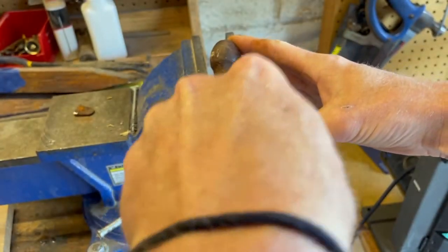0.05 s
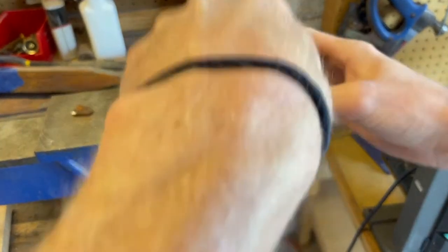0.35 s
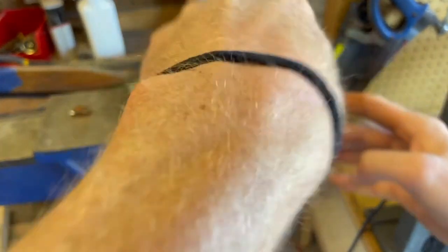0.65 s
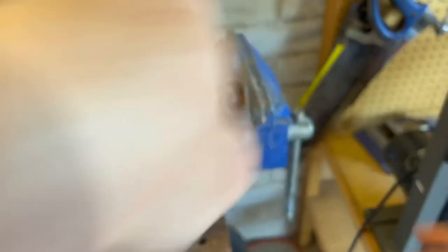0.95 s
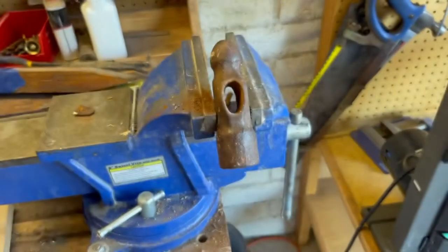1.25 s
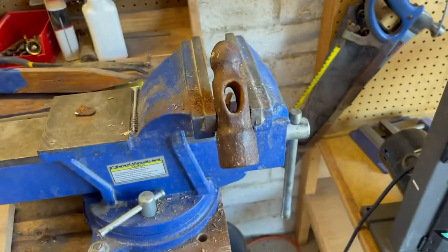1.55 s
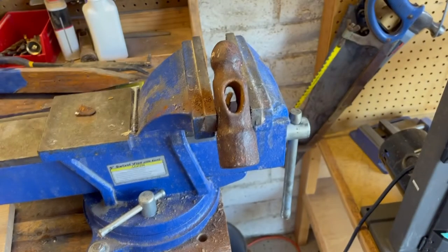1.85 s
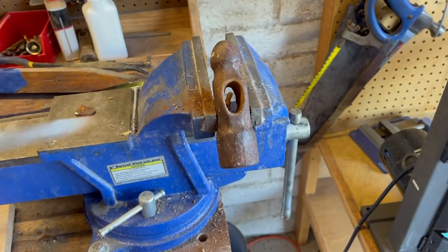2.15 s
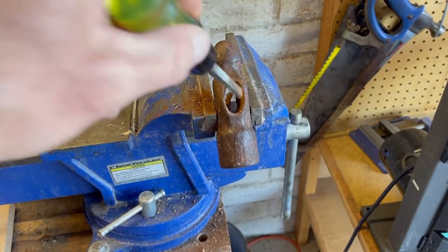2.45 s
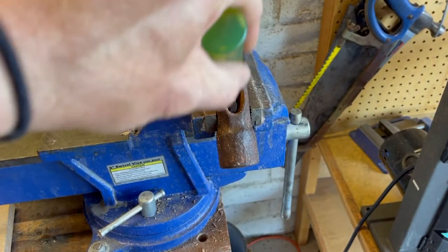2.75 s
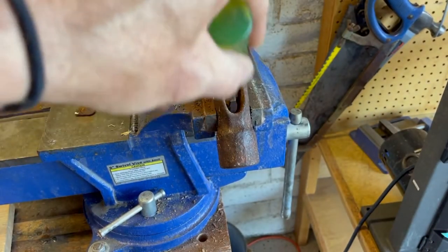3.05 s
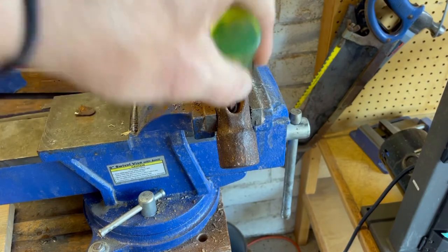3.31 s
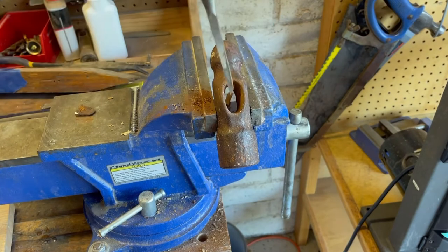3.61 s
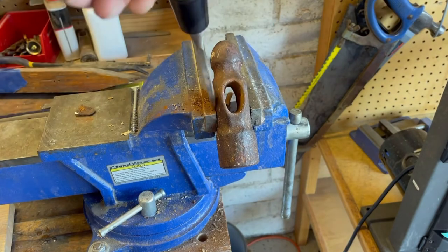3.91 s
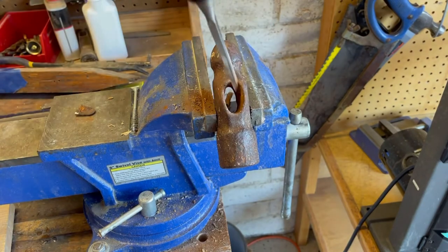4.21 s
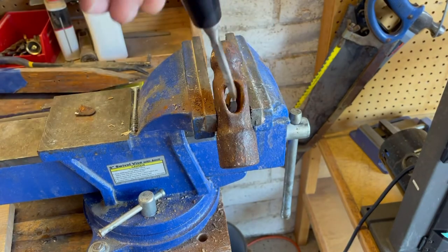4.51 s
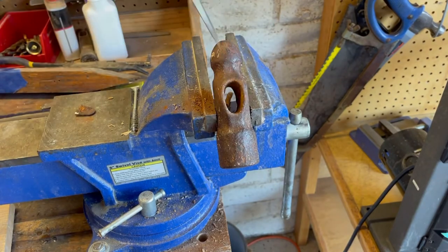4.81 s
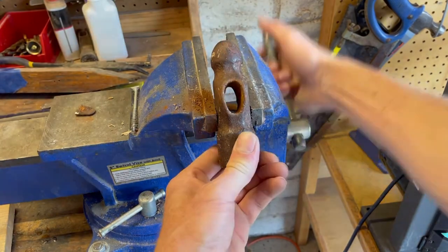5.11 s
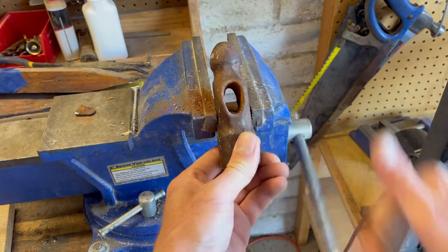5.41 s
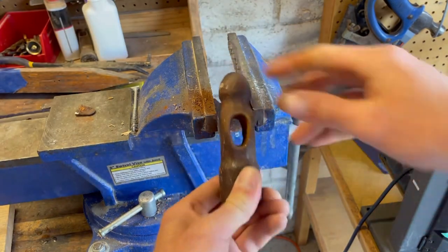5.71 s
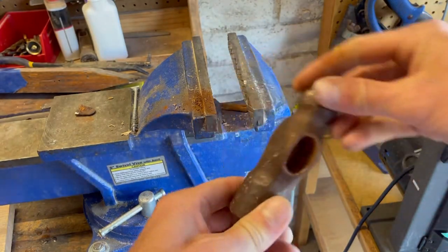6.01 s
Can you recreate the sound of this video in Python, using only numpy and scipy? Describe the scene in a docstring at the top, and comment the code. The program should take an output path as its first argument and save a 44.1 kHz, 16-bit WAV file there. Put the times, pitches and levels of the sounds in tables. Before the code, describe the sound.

A screwdriver prises at a steel hammer head in a vise with sharp ringing clicks and scrapes, then the vise handle rattles loose.

```python
"""Prising at a hammer head in a vise

A steel hammer head is clamped in a bench vise in a small workshop. A screwdriver prises at the wedge
in its eye (the hole for the handle) in two bouts: the tip grinds, slips and strikes, and head, vise
and bench ring. Then the vise is knocked loose and its handle rattles. A hand rustles, a thin chirp
comes and goes, and the room hums; two close microphones pick it up."""
import sys
import numpy as np
from scipy import signal
from scipy.fft import rfft, irfft, next_fast_len
from scipy.io import wavfile
from scipy.ndimage import uniform_filter1d

SR = 44100
rng = np.random.default_rng(int(sys.argv[2]) if len(sys.argv) > 2 else 0)


def store_pcm(level_fs):
    """Save levels as 16-bit WAV."""
    pcm = np.round(np.clip(level_fs, -1, 1) * 32767).astype(np.int16)
    wavfile.write(sys.argv[1], SR, np.atleast_2d(pcm).T)


N = 276066
TIME = np.arange(N) / SR
AGE = TIME[:SR // 2]  # seconds since a hit
FFT_SIZE = next_fast_len(N + 2 * SR)
FREQ = np.maximum(np.fft.rfftfreq(FFT_SIZE, 1 / SR), 1)
SECOND_BOUT_S = 2  # strokes after this time belong to the second bout

# Each stroke of the tip grinds, slips and strikes; where it lands decides how the vise rings:
# (strike time [s], force [dB], crack above force [dB], treble [dB], grinding beforehand [s],
#  body ring [dB], jaw ring [dB], ping [dB])
STROKES = [(.036, -24, 19, -9, 0.00275, -37.5, -41, -38), (0.1279, -16, 5, 16.5, 0.013, -27.5, -29.5, -36),
           (0.3226, -17, 2, 12, 0.019, -31.5, -38.5, -35), (.436, -28, 17, -10.5, .04, -38, -39.5, -38.5),
           (0.5209, -26, 13, -10, 0.033, -49, -61, -38.5), (0.6284, -25, 5, 4, 0.00262, -45, -35.5, -48),
           (0.6434, -16, 4, -14, 0.0083, -40, -29.5, -44), (.684, -18.5, 9, 3, 0, -26, -42.5, -33.5),
           (.756, -22.5, 6, 12, 0.051, -56.5, -39.5, -44.5),
           (2.3547, -20, 10, -4.5, 0.00038, -45.5, -36.5, -54.5), (2.368, -26.5, 13, -7, 0, -45, -39, -54),
           (2.5074, -26, 15.5, -13, 0.034, -32.5, -39, -31), (2.6216, -21, 6.5, 8, .026, -31, -24.5, -39.5),
           (2.7221, -22.5, 14, -6.5, 0.026, -39.5, -52.5, -35),
           (2.8291, -17.5, 7.5, 13, 0.02, -32, -37, -31.5),
           (2.922, -20.5, 15.5, 10.5, 0.011, -37.5, -44, -43),
           (3.0458, -24.5, -1, 7, 0.011, -39.5, -34, -35.5),
           (3.1188, -18, 7.5, 19, 0.0033, -28.5, -36, -30)]
# Steel touches steel lightly and slides on: (time [s], level [dB], treble [dB], slide length [s])
LIGHT_TAPS = [(1.635, -46, -12, .024), (3.691, -31.5, 9.5, 0.0057), (3.801, -31, -20, .05),
              (3.874, -21, -21.5, .04), (3.912, -28, -7, 0.088), (3.993, -30, 7, 0.0091),
              (4.394, -24.5, -23.5, 0.02), (4.428, -29.5, -15.5, 0.0012), (4.477, -19.5, -12, 0.1),
              (4.483, -26, -24.5, 0.026), (4.499, -35.5, -22.5, 0), (4.972, -26.5, -23, 0.00022),
              (5.519, -30, -18, 0)]
# Tone of the tip on steel: (frequency [Hz], level [dB])
TIP_TONE = [(200, -16), (700, -5), (1400, -4.5), (3300, -2.5), (4700, -1), (6000, -3), (7500, -11),
            (9200, -5.5), (11500, -15.5), (14000, -21), (16000, -32)]


def prising(rasp_db=-6, crunch_s=0.0083):
    """Strikes and grinding sound through the head; crumbling rust and deep grinding rasp the wedge."""
    # Rust crumbles under the tip between strokes: (time [s], level [dB])
    crunches = [(.079, -36.5), (.725, -31.5), (2.573, -44), (2.677, -41), (2.793, -37), (2.888, -38)]
    # Resonances of the wedge in the eye: (frequency [Hz], width [Hz], level [dB])
    wedge_resonances = [(1576, 95, -2.5), (2067, 500, 0)]
    grind = grinding()
    rust = undb(rasp_db) * grind * (TIME > SECOND_BOUT_S)  # the second bout grinds deeper
    for s, db in crunches:
        add(rust, s, undb(db) * scrape(crunch_s, rise_db=0))
    return hammer_head(strikes() + grind) + resonate(rust, wedge_resonances)


def strikes(crack_treble_db=2.0, clash_treble_db=-6, snag_treble_db=10):
    """The tip clicks where it snags; each slip ends in a sharp crack and a short clash of steel."""
    # The tip catches and lets go with a dry click: (time [s], level [dB])
    snags = [(0.1008, -17.5), (0.312, -18.5), (0.495, -21), (2.615, -20), (2.807, -27), (2.9147, -16),
             (3.105, -24), (3.237, -18.5)]
    out = np.zeros((2, N))
    cracks = []
    for s, force_db, crack_db, treble_db, *_ in STROKES:
        clash = undb(force_db) * burst(rise_s=0.0049, t60=0.043)
        add(out, s, brighten(clash, treble_db / 2 + clash_treble_db, corner_hz=6000))
        cracks.append((s, force_db + crack_db, treble_db + crack_treble_db))
    clicks = [(s, db, snag_treble_db) for s, db in snags]
    for s, db, treble_db in cracks + clicks:
        snap = burst(rise_s=0.00082, t60=0.004193, spread=0.095)
        add(out, s, undb(db) * brighten(snap, treble_db, corner_hz=7830))
    return out


def grinding(grind_db=-5, overrun_s=0.005, slide_db=-50):
    """The tip grinds harder and harder until just past each slip; the shaft slides after a tap."""
    out = np.zeros((2, N))
    for s, force_db, _, _, grind_s, *_ in STROKES:
        if grind_s > 0:
            grind = scrape(grind_s + overrun_s, rise_db=12.5)
            add(out, s - grind_s, undb(force_db + grind_db) * grind)
    for s, _, _, slide_s in LIGHT_TAPS:
        if slide_s > 0:
            slide = brighten(scrape(slide_s, rise_db=4), db=4, corner_hz=7200)
            add(out, s, undb(slide_db) * slide)
    return out


def scrape(length_s, rise_db, slips_per_s=650, scatter_db=6, grit_db=-10, slip_fade_s=0.0011):
    """Rust breaks under the steel in tiny uneven slips that grow with the pressure."""
    size = max(int(length_s * SR), 64)
    slipping = rng.random(SR) < slips_per_s / SR
    slips = slipping * undb(scatter_db * np.minimum(rng.standard_normal(SR), 2))
    fading_slips = signal.lfilter([1], [1, -np.exp(-1 / (slip_fade_s * SR))], slips)
    roughness = (unit(fading_slips) + undb(grit_db))[:size]
    pressure = undb(-rise_db * np.linspace(1, 0, size))
    level = unit(pressure * roughness) * np.sqrt(np.mean(pressure ** 2))
    return level * pair(SR, spread=0.83)[:, :size]


def hammer_head(force, pinched_width_hz=55, clink_db=-21, ring_t60=0.21):
    """The tip crunches and the steel rings: muted while the tip presses, clinking once it is free."""
    # Notes of the steel head: (frequency [Hz], level in first bout [dB], level in second bout [dB])
    steel_notes = [(1360, -1, -14), (1475, -3, 2), (1518, -4, -1), (1995, -10, -1), (2270, -3.5, -9),
                   (2734, -3, -13), (3085, -2, -6), (3780, -9, -3), (4468, 3, -5), (4810, -7, -4),
                   (5125, -2, -6)]
    hz, first_db, second_db = np.transpose(steel_notes)
    average_db = (first_db + second_db) / 2
    pinched = resonate(force, [(f, pinched_width_hz, db) for f, db in zip(hz, average_db)])
    hits = [(s, force_db + clink_db + (first_db if s < SECOND_BOUT_S else second_db))
            for s, force_db, *_ in STROKES]
    free = ringing([(f, ring_t60) for f in hz], hits, rise_s=0.00047, spread=0.983, scatter_db=3.5)
    return undb(-0.36) * colour(force, TIP_TONE) + undb(-13.5) * pinched + free


def vise_and_bench(body_db=-22.5, body_follow=0.598, lag_s=0.006, tap_db=-22, sway_hz=145, sway_t60=2.85):
    """The heavy vise answers each blow a little late: its jaws ring and the bench top shakes."""
    # Damped resonances of vise and bench: (frequency [Hz], width [Hz], level [dB])
    bench_resonances = [(118, 53, -4), (336, 170, 7.5), (562, 19, -4), (767, 210, 4.5), (963.3, 49, 6.5),
                        (1307, 190, 2)]
    # Vise notes, two each for body, jaws and ping: (frequency [Hz], level [dB], ring time [s])
    vise_notes = [(340, -3.5, .2), (384, -5, .17), (810, -3.5, .22), (855, -5, .2), (1082, -1, .33),
                  (1066, -11, .12)]
    # The whole bench is jolted: (time [s], level [dB])
    jolts = [(.236, -40.5), (.64, -40), (.692, -38.5), (1.328, -56.5), (1.412, -50), (1.513, -51.5),
             (3.119, -34.5)]
    push, jolt = np.zeros((2, 2, N))
    sway_power = np.zeros(N)
    for s, force_db, *_ in STROKES:
        db = body_db + body_follow * force_db  # the body follows the force only in part
        add(push, s + lag_s, undb(db) * burst(rise_s=0.0024, t60=0.062))
        if s > SECOND_BOUT_S:  # steady levering keeps the vise humming on its base
            add(sway_power, s, swell(TIME, 0.019) * (undb(db) * decay(TIME, sway_t60)) ** 2)
    for s, db, *_ in LIGHT_TAPS:
        add(push, s, undb(db + tap_db) * burst(rise_s=0.0063, t60=0.146))
    for s, db in jolts:
        add(jolt, s, undb(db) * burst(rise_s=0.0011, t60=0.27))
        add(push, s, undb(db + 1) * burst(rise_s=0.0046, t60=0.1))  # a jolt shakes the vise too
    hz, note_db, t60 = np.transpose(vise_notes)
    hits = [(s + lag_s, note_db + np.repeat(ring_db, 2)) for s, _, _, _, _, *ring_db in STROKES]
    ring = ringing(list(zip(hz, t60)), hits, rise_s=0.0021, spread=0.14, scatter_db=-1.0)
    hum = np.sqrt(sway_power) * np.sin(2 * np.pi * sway_hz * TIME)
    boom = resonate(jolt, [(75.29, 65, 0)])
    return undb(8.5) * resonate(push, bench_resonances) + undb(-1.0) * ring + undb(-21) * hum + boom


def taps(tick_treble_db=-4):
    """The screwdriver's shaft ticks against the steel and clinks; the loosened head ticks in the jaws."""
    # Resonances of the shaft: (frequency [Hz], width [Hz], level [dB])
    shaft_resonances = [(870, 25, 1), (1082, 7, 5), (1440, 30, 2), (1560, 14, 5), (2010, 50, -4),
                        (2230, 70, -4), (3100, 50, -8), (3540, 70, -8), (4820, 70, -11)]
    # The head shifts in the slack jaws: (time [s], level [dB])
    head_shifts = [(4.992, -38), (5.519, -40)]
    tick, push, shift = np.zeros((3, 2, N))
    for s, db, treble_db, _ in LIGHT_TAPS:
        touch = burst(rise_s=0.000504, t60=0.011)
        add(tick, s, undb(db) * brighten(touch, treble_db + tick_treble_db, corner_hz=3810))
        add(push, s, undb(db) * burst(rise_s=0.0003839, t60=0.01366))
    for s, db in head_shifts:
        add(shift, s, undb(db) * burst(rise_s=0.00104, t60=0.03155))
    head_ticks = resonate(shift, [(4293, 197, 3), (6400, 350, -5.5)])
    return undb(-2) * colour(tick, TIP_TONE) + undb(-2.5) * resonate(push, shaft_resonances) + head_ticks


def vise_handle(thump_db=-29.5, thump_follow=0.374):
    """The loosened screw and its sliding bar clatter in their slack and thump the bench."""
    # Knocks of screw and handle: (time [s], level [dB], treble [dB])
    knocks = [(4.995, -47.5, 11.5), (5.145, -55, 16.5), (5.187, -35, 13), (5.207, -24.5, -16),
              (5.284, -28.5, -22.5), (5.3, -35.5, -35), (5.362, -30.5, -42), (5.473, -33.5, -15),
              (5.562, -31.5, -1)]
    # Tone of the handle's clack and of the bench's thud: (frequency [Hz], level [dB])
    clack_tone = [(150, -22.5), (330, -2.5), (620, -3.5), (800, 4), (1080, 2.5), (1350, -0.5), (1800, -11),
                  (2500, -10), (3800, -18.5), (6000, -26.5), (14000, -55)]
    thud_tone = [(40, -25), (90, -2.5), (160, 2.5), (220, -6.5), (335, 5), (500, 1.5), (800, -32),
                 (3000, -66.5)]
    # Resonances of screw and bar: (frequency [Hz], width [Hz], level [dB])
    bar_resonances = [(785, 40, -4), (1030, 140, 2), (1310, 35, -4), (2480, 90, -2)]
    clack, thud = np.zeros((2, 2, N))
    for s, db, treble_db in knocks:
        blow = burst(rise_s=0.00057, t60=0.088)
        for corner_hz in (2300, 2340):  # two filters: a soft contact loses its treble steeply
            blow = brighten(blow, treble_db / 2, corner_hz)
        add(clack, s, undb(db) * blow)
        # the screw's weight thumps much alike however hard the bar clacks
        add(thud, s, undb(thump_db + thump_follow * db) * burst(rise_s=0.0054, t60=0.25))
    clank = undb(-10.5) * resonate(clack, bar_resonances)
    return undb(6.5) * colour(clack, clack_tone) + clank + undb(9.5) * colour(thud, thud_tone)


def shudder(start_s=5.08, length_s=0.24, level_db=-40.5):
    """The bench swells into a low shudder as the tension leaves the screw."""
    # Low resonances of the bench: (frequency [Hz], width [Hz], level [dB])
    low_resonances = [(72.27, 15, -2), (144.4, 32.5, 3), (197.6, 15.96, -0.5)]
    size = int(length_s * SR)
    push = np.zeros((2, N))
    add(push, start_s, np.hanning(size) * pair(size, spread=0))
    return undb(level_db) * resonate(push, low_resonances)


def end_stop(time_s=5.563, level_db=-37):
    """The sliding bar falls to the end of its travel with a bright clank."""
    # Notes of the bar: (frequency [Hz], level [dB], ring time [s])
    bar_notes = [(345, -1, .3), (1590, -4, .11), (1836, -4, .11), (2514, -6, .13), (2985, -3, .09),
                 (3973, -8, .1)]
    hz, db, t60 = np.transpose(bar_notes)
    return ringing(list(zip(hz, t60)), [(time_s, level_db + db)], rise_s=0.00051, spread=0.85,
                   scatter_db=2.5)


def chirps(waver=0.0269):
    """Faint, unsteady high whistles that hold their pitch or glide."""
    # Whistles: (time [s], length [s], starting pitch [Hz], final pitch [Hz], level [dB])
    whistles = [(4.065, .09, 3880, 3900, -64), (4.21, .12, 3820, 3950, -64), (4.33, .07, 4500, 4100, -61),
                (4.56, .06, 3600, 3540, -56), (4.859, .034, 3860, 3880, -52), (5.09, .06, 3950, 3950, -58)]
    out = np.zeros((2, N))
    for s, length_s, start_hz, end_hz, db in whistles:
        size = int(length_s * SR)
        wobble = unit(uniform_filter1d(rng.standard_normal(SR), size=60))[:size]
        hz = np.linspace(start_hz, end_hz, size) * (1 + waver * wobble)
        whistle = np.sin(2 * np.pi * np.cumsum(hz) / SR)
        add(out, s, undb(db) * signal.windows.tukey(size, .5) * whistle)
    return out


def rustle(swell_s=0.22, flutter_db=1.5):
    """Hand and tool slide softly, with an uneven grip."""
    # Each rub swells, holds and dies away: (start [s], end [s], level [dB], fade [dB/s])
    rubs = [(-.2, -0.008, -44.5, 57), (1.257, 1.637, -60.5, 16.5), (1.436, 1.535, -56.5, 120.5),
            (4.427, 4.871, -57.5, 249), (4.897, 5.215, -60.5, 19), (6, 6.255, -70, 23)]
    # Tone of the rubbing: (frequency [Hz], level [dB])
    rub_tone = [(200, 0.5), (500, -1), (1500, 0.5), (3000, -4), (6500, -4.5), (9000, -10), (13500, -10),
                (16000, -30.5)]
    flutter = unit(uniform_filter1d(rng.standard_normal(N), size=500))
    level = np.zeros(N)
    for start, end, db, fade in rubs:
        fade_in = np.clip((TIME - start) / swell_s, 0, 1)
        level += fade_in * undb(db - fade * np.maximum(TIME - end, 0))
    return colour(pair(N, spread=0.98), rub_tone) * level * undb(flutter_db * flutter)


def room_echo(x, tail_db=-8, early_db=-11, early_t60=0.017):
    """Bench top and wall answer at once; the room follows with a tail that dulls as it fades."""
    # How long the room rings: (frequency [Hz], ring time [s])
    ring_times = [(100, 0.81), (400, 0.64), (1500, 0.5385), (4000, 0.523), (8000, 0.26), (15000, 0.45)]
    t, noise = TIME[:SR], rng.standard_normal((2, SR))
    tail = 0
    for band_hz, t60 in ring_times:
        band = curve([(hz, hz == band_hz) for hz, _ in ring_times])
        tail = tail + filtered(noise, band)[:, :SR] * decay(t, t60)
    tail = brighten(tail * swell(t, 0.0017), db=-3.5, corner_hz=5570)
    early = pair(SR, spread=0.39) * decay(t, early_t60) * (t > .003)
    response = (undb(tail_db) * unit(tail) + undb(early_db) * unit(early)) / np.sqrt(SR)
    return filtered(x, rfft(response, FFT_SIZE))


def room_hum(level_db=-57):
    """The room hums with a steady, low noise."""
    # Tone of the hum: (frequency [Hz], level [dB])
    hum_tone = [(20, -21), (40, -1.5), (70, 5.5), (110, -5.5), (160, -6.5), (370, -13), (600, -21),
                (1000, -21.5), (2500, -36.5), (13000, -46.5), (16000, -54)]
    return undb(level_db) * colour(pair(N, spread=1.0), hum_tone)


def ringing(notes, hits, rise_s, spread, scatter_db, detune=.002):
    """Notes (Hz, t60) ring after hits (s, dB per note), varying a little in level and pitch each time."""
    hz, t60 = np.transpose(notes)[:, :, None]
    tones = np.exp(2j * np.pi * hz * AGE) * decay(AGE, t60) * swell(AGE, rise_s)
    out = np.zeros((2, N))
    for s, db in hits:
        gain = undb(db + scatter_db * rng.standard_normal(len(notes)))
        phase = 2 * np.pi * rng.random(len(notes)) + spread * rng.standard_normal((2, len(notes)))
        channels = ((gain * np.exp(1j * phase)) @ tones).imag
        stretched_age = AGE * (1 + detune * rng.standard_normal())
        add(out, s, np.array([np.interp(stretched_age, AGE, ring) for ring in channels]))
    return out


def burst(rise_s, t60, spread=1):
    """One contact sets off many vibrations at once, heard as noise that dies quickly."""
    return pair(len(AGE), spread) * swell(AGE, rise_s) * decay(AGE, t60)


def swell(t, rise_s):
    """Rise from 0 towards 1."""
    return 1 - np.exp(-t / rise_s)


def decay(t, t60):
    """Die away; the ring time t60 is the seconds it takes to fall by 60 dB."""
    return np.exp(-np.log(1000) * t / t60)


def resonate(x, resonances):
    """Pass a sound through resonances: (frequency [Hz], width [Hz], relative level [dB])."""
    peaks = sum(undb(db) / (1 + 1j * (FREQ / hz - hz / FREQ) * hz / width) for hz, width, db in resonances)
    return filtered(x, unit(peaks))


def brighten(x, db, corner_hz):
    """Turn the treble up or down: a harder contact is brighter."""
    low = signal.lfilter(*signal.butter(1, min(corner_hz, SR / 3), fs=SR), x)
    return low + undb(db) * (x - low)


def colour(x, tone):
    """Give a sound a tone: (frequency [Hz], relative level [dB])."""
    cepstrum = irfft(np.log(undb(curve(tone))), FFT_SIZE)
    cepstrum[FFT_SIZE // 2:] = 0  # so the filter rings after a hit, not before
    return filtered(x, unit(np.exp(2 * rfft(cepstrum))))


def curve(points):
    """Join (frequency [Hz], value) points with lines, giving each octave equal room."""
    hz, value = np.transpose(points)
    return np.interp(np.log(FREQ), np.log(hz), value)


def filtered(x, response):
    """Multiply each frequency of a sound by its own gain."""
    return irfft(rfft(x, FFT_SIZE) * response, FFT_SIZE)[..., :N]


def pair(size, spread):
    """Noise at two microphones; spread 0 is alike, 1 unrelated."""
    mid, side = rng.standard_normal((2, size))
    return np.array([mid + spread * side, mid - spread * side]) / np.hypot(1, spread)


def add(track, s, sound):
    """Mix a sound into a track, starting at s seconds."""
    start = max(int(s * SR), 0)
    part = sound[..., :N - start]
    track[..., start:start + part.shape[-1]] += part


def unit(x):
    """Scale to an average power of 1."""
    return x / np.sqrt(np.mean(np.abs(x) ** 2))


def undb(db):
    """Turn decibels into a gain."""
    return 10 ** (np.asarray(db) / 20)


def scene(second_bout_echo_db=-4):
    """All the work at the vise, with the room's echo, over a low hum."""
    tip = prising()
    rest = vise_and_bench() + taps() + vise_handle() + shudder() + end_stop() + chirps() + rustle()
    # in the second bout the tip sounds drier, with less room echo
    echo = room_echo(rest + tip * undb(second_bout_echo_db * (TIME > SECOND_BOUT_S)))
    return undb(-3.0) * (tip + rest + echo) + room_hum()


def record(dry, top_hz=15900):
    """Two close microphones: alike in bass and high treble, apart in level and phase between."""
    # How the microphones differ:
    # (frequency [Hz], left minus right [dB], left's phase lead [rad], unrelated part [dB])
    microphones = [(60.3, 1.5, -0.5, -16), (323, 0.31, 1.1545, -13.5), (770, 3, 0, 1.5), (2020, 2.5, 1, -2),
                   (3010, 3, 1.6245, -2), (4270, 5, -0.5, -2.5), (5950, 2, -0.5, 4.5), (9188, 1, -3.5, -30),
                   (12380, -1, -5.5, -24.5)]
    balance_db, lead, apart_db = (curve(np.array(microphones)[:, [0, k]]) for k in (1, 2, 3))
    apart = undb(apart_db)
    mid_side_gains = np.array([np.ones_like(apart), apart]) / np.sqrt(2 + 2 * apart ** 2)
    mid, side = filtered(np.array([dry[0] + dry[1], dry[0] - dry[1]]), mid_side_gains)
    left_gain = undb(balance_db / 2) * np.exp(.5j * lead)
    stereo = filtered(np.array([mid + side, mid - side]), np.array([left_gain, 1 / left_gain]))
    treble_cut = signal.ellip(8, .2, 70, top_hz, fs=SR, output="sos")
    return signal.sosfilt(treble_cut, stereo)


dry = scene()
out = record(dry)
store_pcm(out)
```